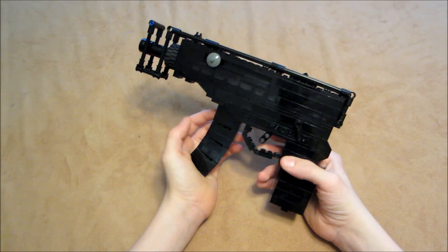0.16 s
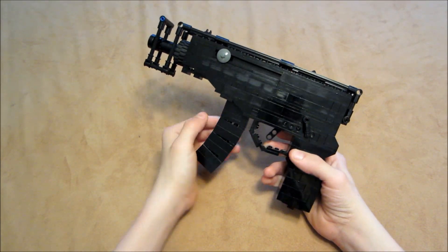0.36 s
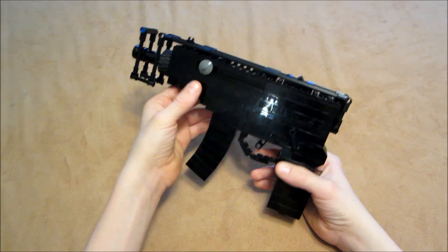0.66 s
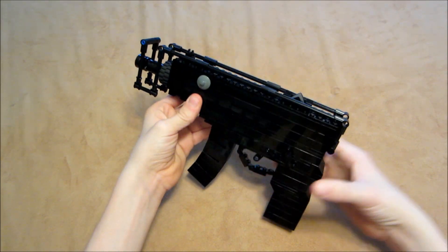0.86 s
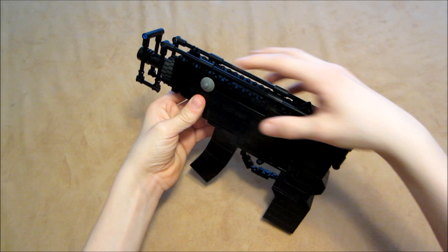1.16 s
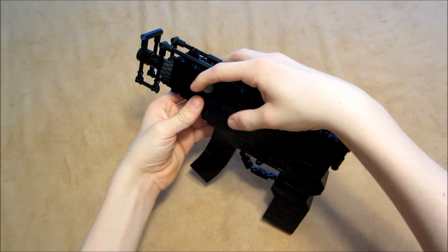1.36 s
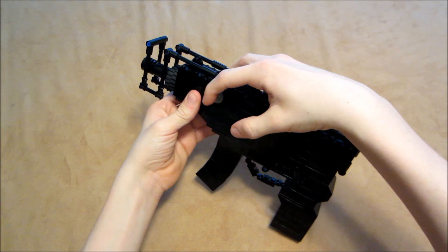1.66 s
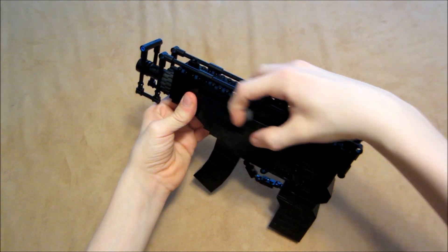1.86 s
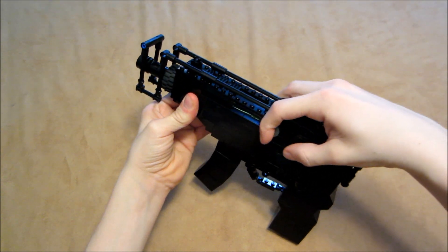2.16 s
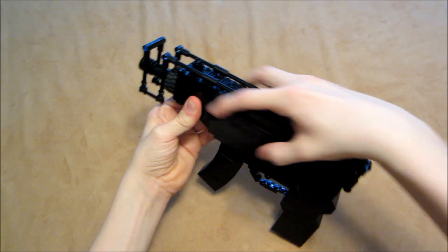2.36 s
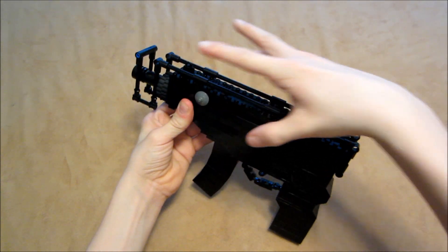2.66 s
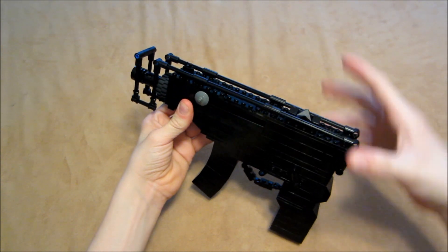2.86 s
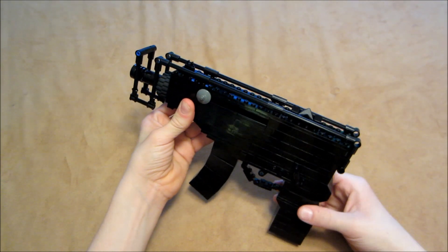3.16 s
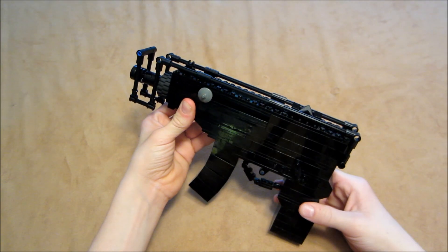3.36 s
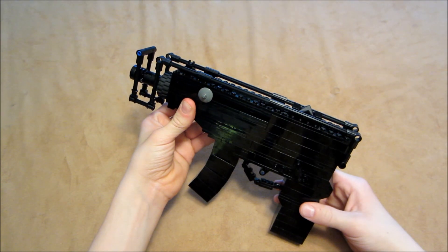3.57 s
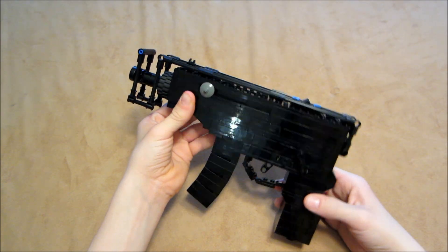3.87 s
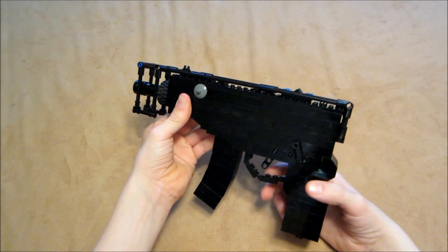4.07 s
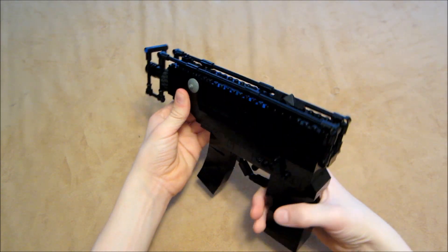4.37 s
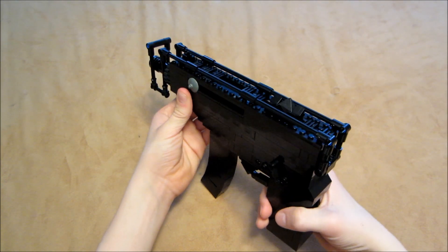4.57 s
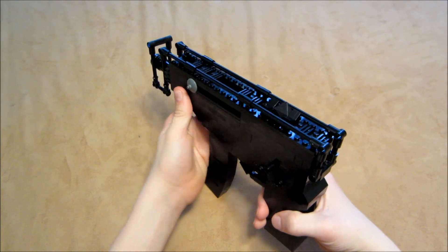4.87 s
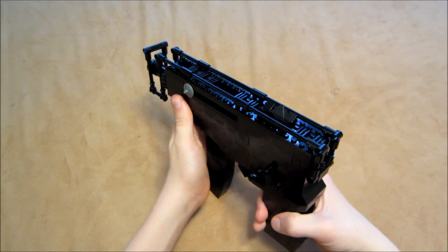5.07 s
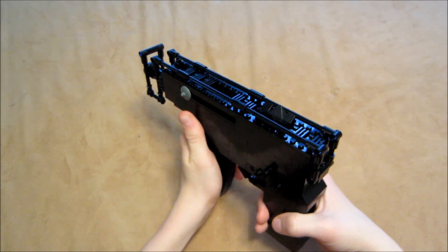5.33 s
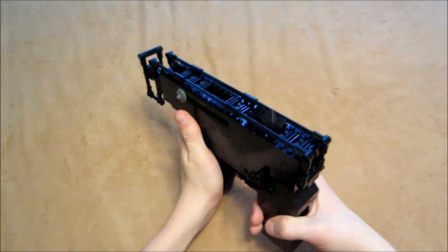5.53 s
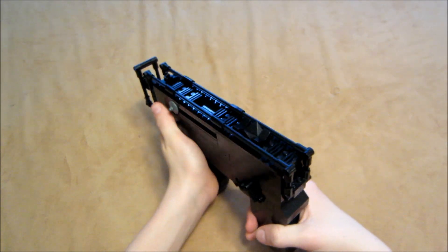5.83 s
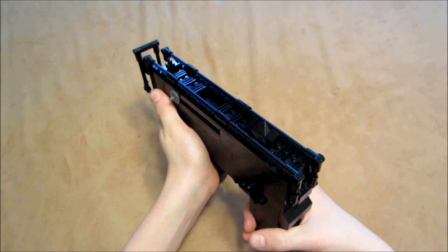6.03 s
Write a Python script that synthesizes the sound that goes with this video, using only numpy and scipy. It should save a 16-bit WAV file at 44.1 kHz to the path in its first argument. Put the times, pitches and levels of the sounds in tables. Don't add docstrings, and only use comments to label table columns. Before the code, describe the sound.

Hollow plastic clicks and rattles, a grinding slide and one crisp snap in a quiet room with low hum, fan and faint ticking.

```python
import sys
import numpy as np
from scipy import signal
from scipy.fft import rfft, irfft
from scipy.io import wavfile
from scipy.ndimage import uniform_filter1d

SR = 44100
rng = np.random.default_rng(int(sys.argv[2]) if len(sys.argv) > 2 else 0)


def wav_out(sig):
    wavfile.write(sys.argv[1], SR, np.round(np.clip(np.atleast_2d(sig).T, -1, 1) * 32767).astype(np.int16))


def amplitude_ratio(level_db):
    exponent = np.asarray(level_db, float) / 20
    return 10 ** exponent


N = 273420

# (frequency [Hz], width [Hz], level [dB])
BRICK_MODES = [(410, 250, -0.5), (810, 480, -1.5), (1250, 290, -1.5), (1540, 160, -8), (1756, 150, -6),
               (2210, 200, -2.5), (2900, 81, -26)]
# (frequency [Hz], density [dB per Hz])
EDGE_COLOUR = [(1530, -0.5), (2600, -3), (2950, -4), (3300, -7.5), (3610, -3.5), (5070, -7), (7630, -24),
               (8000, -60), (10400, -47), (17600, -120)]
# (frequency [Hz], density [dB per Hz])
SNAP_COLOUR = [(4710, -70), (6500, -28), (7900, -35.5), (8800, -13.5), (9840, -5.5), (12400, -2.5),
               (15100, -7), (16000, -38), (16400, -25.5)]
# (peak [s], rise [s], fall [s], skin [dB], rattle [dB])
RUBS = [(0.385, .015, 0.076, -70, -81), (0.71, 0.14, 0.28, -72, -74.5), (0.91, 0.11, 0.04, -74, -69.5),
        (1.0, .08, 0.045, -72.5, -77), (1.64, 0.044, 0.32, -74, -72.5), (1.96, 0.19, 0.35, -64, -62.5),
        (2.46, 0.075, 0.14, -55.5, -58), (2.525, 0.093, 0.026, -58, -59), (3.16, 0.088, 0.092, -77, -74),
        (4.48, 0.093, 0.088, -77, -75), (4.55, 0.041, .08, -73, -69), (4.61, 0.078, 0.037, -66, -63),
        (4.78, 0.42, 0.1, -80, -73), (4.99, 0.12, 0.023, -70.5, -66), (5.16, 0.82, 0.31, -80, -77),
        (5.46, 0.046, 0.061, -63, -61), (5.56, 0.31, 0.21, -76, -65.5), (5.71, 0.21, 0.26, -67.5, -70),
        (5.92, 0.11, 0.23, -72, -74)]
# (lean [dB], grind [dB], rattle [dB], skin [dB])
REST_DB = (-61, -78, -95, -99)


def evened(x):
    return x / np.sqrt(np.mean(x ** 2) + 1e-20)


def read(points, hz):
    f, value = np.transpose(points)
    return np.interp(np.log(hz + 1), np.log(f + 1), value)


def add(mix, start_s, sound):
    part = mix[round(start_s * SR):][:len(sound)]
    part += sound[:len(part)]


def sine(hz, t):
    return np.sin(2 * np.pi * hz * t)


def coloured(x, spectrum):
    n = x.shape[-1]
    return irfft(rfft(x) * amplitude_ratio(read(spectrum, np.fft.rfftfreq(n, 1 / SR))), n)


def resonate(x, hz, width_hz):
    turn = np.exp(2j * np.pi * np.cumsum(hz * np.ones(len(x))) / SR)
    r = np.exp(-np.pi * width_hz / SR)
    return 2 * (turn * signal.lfilter([1 - r], [1, -r], x * turn.conj())).real


def grit(per_s, spread_db):
    size = amplitude_ratio(spread_db * np.minimum(rng.exponential(1, N), 4)) * rng.standard_normal(N)
    return size * (rng.random(N) < per_s / SR)


def burst(spectrum, t60_s, rise_ms, size=2048):
    t = np.arange(size) / SR
    crack = coloured(rng.standard_normal(size), spectrum)
    crack = crack * amplitude_ratio(-60 * t / t60_s) * np.minimum(t / rise_ms * 1e3, 1)
    return crack / abs(crack).max()


def strokes(rows, rest_db):
    swell_db = 33
    t = np.arange(0, N, 64) / SR
    peak, rise, fall, db = np.transpose(rows)[..., None]
    away = np.where(t < peak, (peak - t) / np.maximum(rise, 1e-3), (t - peak) / np.maximum(fall, 1e-3))
    power = (amplitude_ratio(db - swell_db * away) ** 2).sum(0) + amplitude_ratio(rest_db) ** 2
    return np.interp(np.arange(N) / SR, t, np.sqrt(power))


def background():
    # (frequency [Hz], density [dB per Hz])
    air_colour = [(12, -26), (22, 2), (35, -0.5), (65, -10.5), (120, -7), (200, -8.5), (450, -15),
                  (950, -21.5), (1500, -28), (2000, -33.5), (2800, -47.5), (3600, -81.5)]
    # (frequency [Hz], density [dB per Hz])
    hiss_colour = [(1410, -16), (2400, -4), (3770, -4.5), (6200, -8.5), (7520, -23.5), (7700, -48),
                   (8210, -20), (9650, -12.5), (15300, -5.5), (16400, -11)]
    # (frequency [Hz], correlation [-1 to 1])
    likeness = [(60, -0.05), (150, 0.12), (380, 0.28), (950, 0.13), (2380, -0.14), (5980, -0.035),
                (15000, 0.053)]
    # (harmonic [multiple], level [dB rms])
    hum_harmonics = [(1, -56.5), (2, -66), (3, -69.5), (4, -73.5), (5, -73.5)]
    # (frequency [Hz], level [dB rms], width [Hz])
    fan_tones = [(1093.5, -70, 61), (680, -91.5, 1.8), (1712, -83, 47)]
    # (frequency [Hz], left [dB], right [dB])
    whines = [(3843, -106, -109), (7867, -88, -98), (13011, -99, -105), (15734.27, -79.5, -79.4),
              (15747.29, -84.7, -84.9)]
    air_db, hiss_db, hum_hz = -52.5, -76, 120
    lag_s = np.array([[1.1 / SR], [0]])
    hz, t = np.fft.rfftfreq(N, 1 / SR), np.arange(N) / SR
    same = np.clip(read(likeness, hz), -1, 1)

    def pair(spectrum):
        a, b = rfft(coloured(rng.standard_normal((2, N)), spectrum))
        return evened(irfft(np.array([a, same * a + np.sqrt(1 - same ** 2) * b]), N))

    wash = amplitude_ratio(air_db) * pair(air_colour) + amplitude_ratio(hiss_db) * pair(hiss_colour)
    waver = 1 + 0.2 * evened(resonate(rng.standard_normal(N), 0, 3.2))
    hum = waver * sum(amplitude_ratio(db + 3.5) * np.sin(k * (2 * np.pi * hum_hz * t + k)) for k, db in hum_harmonics)
    fan = np.zeros(N)
    for f, db, width_hz in fan_tones:
        flutter = resonate(resonate(rng.standard_normal(N), f, width_hz), f, width_hz)
        fan += amplitude_ratio(db) * evened(2 * sine(f, t) + evened(flutter))
    whine = sum(amplitude_ratio([[left_db + 0.5], [right_db]]) * sine(f, t - lag_s) for f, left_db, right_db in whines)
    return wash + hum * amplitude_ratio([[-1.1], [1.1]]) + fan + whine


def motor():
    # (start [s], end [s], out step [dB], back step [dB])
    runs = [(0.01, 0.8, -56, -57), (0.857, 0.9, -55, -69), (1.053, 2.25, -55.5, -58),
            (3.347, 3.5, -48.5, -65), (3.555, 3.7, -70, -56), (3.762, 3.9, -53.5, -61),
            (3.974, 4.1, -62, -60), (4.1829, 4.3, -55, -56.5), (4.389, 4.75, -55, -56.5),
            (4.807, 5.35, -54.5, -61), (5.431, 5.8, -53.5, -57)]
    cycle_s, back_s, spread_db = 0.2086, 0.1322, -0.5
    out, t = np.zeros(N), np.arange(600) / SR
    tone = sine(3840, t) + 0.48 * sine(4300, t) + 0.33 * sine(5400, t)
    ring = amplitude_ratio(-60 * t / 0.0095) * tone * (1 - np.exp(-t / 0.00079))
    for start, end, out_db, back_db in runs:
        for s in np.arange(start, end, cycle_s):
            for late_s, step_db in ((0, out_db), (back_s, back_db)):
                db = step_db + spread_db * rng.standard_normal()
                snap = amplitude_ratio(db - 9.5) * burst(SNAP_COLOUR, 0.01, 0.17)[:600]
                edge = amplitude_ratio(db - 3) * burst(EDGE_COLOUR, 0.008, 0.24)[:600]
                add(out, s + late_s, amplitude_ratio(db) * ring + snap + edge)
    return out


def leaning():
    # (peak [s], rise [s], fall [s], level [dB])
    leans = [(0.38, 0.17, 0.044, -62), (0.9, 0.96, 0.79, -66), (1.36, 0.11, 0.034, -48.5),
             (1.42, 0.067, 0.36, -49), (1.645, 0.071, 0.37, -41), (1.76, 0.27, 0.14, -49.5),
             (1.9, 0.24, 0.64, -46), (2.09, 0.049, 0.21, -48), (2.377, 0.04, 0.085, -43),
             (2.495, 0.16, 0.14, -35.5), (4.48, 0.092, .12, -62), (4.71, 0.052, 0.33, -44.5),
             (4.96, 0.098, 0.16, -51), (5.14, 0.32, 0.11, -49.5), (5.22, 0.098, 0.91, -51.5),
             (5.5, 0.048, 0.14, -54), (5.7, 0.11, 0.11, -48.5), (5.92, 0.24, 0.38, -50)]
    shove = rng.standard_normal(N)
    lean = resonate(resonate(shove, 65.6, 24), 60, 43)
    lean = lean + 0.87 * resonate(resonate(shove, 118, 32), 124, 31)
    lean = lean / np.sqrt(uniform_filter1d(lean ** 2, size=2600))
    return amplitude_ratio(-1) * lean * strokes(leans, REST_DB[0])


def knocking():
    # (time [s], blow [dB], deep modes [dB], middle modes [dB], board modes [dB])
    knocks = [(0.951, -18, -4, 2, -5.5), (0.971, -42, -11, 4, -6), (1.636, -57, -19, -7, -20),
              (1.751, -35.5, 2, -12, -22), (2.128, -41.5, -36, 5.5, -6), (3.288, -31, 1.5, 6.5, -13.5),
              (4.5976, -23.5, -4.5, 3.5, 0), (4.6136, -36, -26, -9, -0.5), (5.151, -52, 5, -0.5, 1),
              (5.442, -40, -12, 20.5, -21), (5.692, -46, -20, 20.5, -18), (5.848, -26, -1, -11, -13),
              (5.87, -59.5, -19, -17, 4)]
    # (frequency [Hz], level [dB], t60 [s])
    low_modes = [(41.4, -17, 0.88), (64.55, -1, 0.45), (88.6, -5, 0.17), (109.2, -1.5, 0.44),
                 (117, -3.5, 0.21), (136.6, -1.6, 0.3), (171.7, 0, 0.14), (187.9, -6, 0.22)]
    # (frequency [Hz], level [dB], t60 [s])
    board_modes = [(225, -1.5, 0.11), (258.5, 3.5, 0.099), (297, -3.5, 0.18), (302, 2, 0.084),
                   (349.5, -5.5, 0.3), (409, 3, 0.16), (457, -12, 0.15), (477, -4.5, .13),
                   (509, -10.5, 0.13), (577, -24.5, 0.27), (593, -17, 0.24), (627, -4, 0.095),
                   (739, 0.5, 0.1), (802, -9.5, 0.14)]
    low_sides = [-1, -1, -1, -1, -1, 1, 1, -1]
    board_sides = [1] * 12 + [-1, 1]
    # (frequency [Hz], density [dB per Hz])
    thud_colour = [(130, -26), (220, -9.5), (251, 7), (505, 2.5), (675, -23.5), (777, 2), (910, -44),
                   (1600, -33.5), (2080, -55), (3520, -120)]
    hard_contact_ms, softer_ms_per_db = 1.62, 0.5
    out, t = np.zeros(N), np.arange(SR // 2) / SR

    def rings(modes, sides):
        return [side * amplitude_ratio(db - 60 * t / t60_s) * np.cos(2 * np.pi * hz * t)
                for (hz, db, t60_s), side in zip(modes, sides)]

    low = rings(low_modes, low_sides)
    deep, middle, board = sum(low[:4]), sum(low[4:]), sum(rings(board_modes, board_sides))
    for s, db, deep_db, middle_db, board_db in knocks:
        contact_ms = max(hard_contact_ms - softer_ms_per_db * board_db, 0.5)
        push = np.sin(np.pi * np.minimum(t[:600] / contact_ms * 1e3, 1)) ** 2
        modes = amplitude_ratio(deep_db) * deep + amplitude_ratio(middle_db) * middle + amplitude_ratio(board_db) * board
        add(out, s - contact_ms / 2000, amplitude_ratio(db) * np.convolve(modes, push / push.sum()))
        add(out, s, amplitude_ratio(db - 2.5 + 1.8 * board_db) * burst(thud_colour, 0.12, 2.2, size=8192))
    return out


def skin(spread_db):
    rubs = [row[:4] for row in RUBS]
    return evened(coloured(grit(12000, spread_db), SNAP_COLOUR)) * strokes(rubs, REST_DB[3])


def wide_skin():
    return amplitude_ratio(-9) * skin(1.5) * np.array([[1], [-1]])


def scrape():
    # (peak [s], rise [s], fall [s], level [dB])
    grinds = [(0.87, .5, 0.036, -69), (1.004, 0.081, 0.087, -60), (1.38, 0.081, 0.043, -56.5),
              (1.5, 0.22, 0.41, -70), (1.898, .012, 0.11, -52.5), (2.0, 0.2, 0.33, -52.5),
              (2.08, .15, 0.09, -64), (2.2, 0.086, 0.11, -59.5), (2.378, .006, 0.4, -53),
              (2.46, 0.085, 0.22, -43.5), (2.55, .1, 0.051, -99), (4.2, 0.15, 0.24, -63.5),
              (4.48, 0.041, .08, -55), (4.554, 0.065, 0.13, -48.5), (4.611, 0.057, 0.073, -39.5),
              (4.66, .05, 0.078, -64), (4.93, 0.024, 0.036, -56), (5.17, .05, 0.18, -65),
              (5.45, 0.049, .2, -61.5), (5.499, 0.054, 0.077, -47), (5.57, 0.12, 0.47, -63),
              (5.75, 0.14, 0.12, -57.5), (5.848, 0.031, 0.064, -50)]
    rattle_under_grind_db = -11
    slips = grit(3000, 1.7)
    grip = 1 + 0.016 * evened(resonate(resonate(rng.standard_normal(N), 0, 22), 0, 22))
    hollow = np.zeros(N)
    for k, (hz, width_hz, db) in enumerate(BRICK_MODES):
        hollow += (-1) ** k * amplitude_ratio(db) * resonate(resonate(slips, hz * grip, width_hz), hz * grip, 440)
    rattle = coloured(grit(3300, 1.8) + 0.5 * slips, EDGE_COLOUR)
    shaken = [(s, rise, fall, db + rattle_under_grind_db) for s, rise, fall, db in grinds]
    shaken += [(s, rise, fall, db) for s, rise, fall, _, db in RUBS]
    return evened(hollow) * strokes(grinds, REST_DB[1]) + evened(rattle) * strokes(shaken, REST_DB[2])


def shudder():
    # (frequency [Hz], width [Hz], level [dB])
    shell_modes = [(700, 82, -5.5), (1240, 80, 1), (1573, 72, -2), (1888, 83, -3), (2300, 130, -7.5),
                   (3050, 200, -26), (3630, 150, -19), (4440, 140, -18), (5800, 200, -29)]
    # (peak [s], rise [s], fall [s], level [dB])
    shudders = [(0.962, 0.016, .05, -43.5), (0.972, .02, .03, -46), (0.998, 0.044, .06, -51.5),
                (1.015, .03, 0.13, -59.5), (1.36, .02, .06, -65), (1.382, 0.022, 0.065, -58),
                (1.475, .02, 0.073, -67), (1.527, .012, 0.069, -60.5), (1.668, .04, .06, -66.5),
                (1.9, 0.013, 0.1, -52.5), (1.95, .1, .15, -62), (2.47, .02, 0.051, -50),
                (4.565, .05, 0.054, -53), (4.62, .02, .08, -56), (5.15, 0.0066, 0.052, -57),
                (5.51, .02, 0.14, -58), (5.6, .1, 0.52, -64.5)]
    shake = rng.standard_normal(N)
    shake = shake * abs(shake)
    out = np.zeros(N)
    for k, (hz, width_hz, db) in enumerate(shell_modes):
        out += (-1) ** k * amplitude_ratio(db) * evened(resonate(resonate(shake, hz, width_hz), hz, 360))
    return evened(out) * strokes(shudders, -100)


def catch():
    # (frequency [Hz], level [dB], t60 [s])
    catch_modes = [(710, -19, .008), (1250, -9, 0.0038), (1650, 1.5, 0.015), (2170, 1.5, 0.011),
                   (2900, -12, 0.0075), (3550, -19, .01), (4400, -27, .01), (4780, -12.5, 0.0069)]
    # (time [s], level [dB])
    blows = [
        (5.4801, -21.5),
        (5.4816, -15),
    ]
    out, t = np.zeros(N), np.arange(2048) / SR
    ring = -sum(amplitude_ratio(db - 60 * t / t60_s) * sine(hz, t) for hz, db, t60_s in catch_modes)
    ring = ring * (1 - np.exp(-t / 0.00015))
    for s, db in blows:
        add(out, s, amplitude_ratio(db) * ring)
    return out


def pins():
    # (time [s], level [dB], frequency [Hz])
    ticks = [(0.951, -47.5, 4440), (0.951, -54, 3630), (1.472, -58, 3750), (2.384, -47, 1040),
             (2.4415, -45, 1100), (2.4445, -48, 700), (2.46, -57, 4050), (2.4895, -42, 940),
             (2.4895, -50, 3000), (2.503, -44.5, 2300), (2.527, -62, 4200), (2.527, -49, 890),
             (3.263, -70, 1550), (4.479, -56, 2010), (4.4815, -56, 3900), (4.5675, -60, 4000),
             (4.574, -53, 5200), (4.582, -58, 5200), (4.605, -37, 2100), (4.6145, -53, 2200),
             (4.619, -46, 3100), (4.553, -47, 1250), (3.2635, -61, 12100), (1.4608, -56, 1490),
             (1.8955, -57, 1300), (2.4594, -38, 2300), (4.973, -64, 6100), (4.981, -62, 5900),
             (4.988, -59, 6100), (4.994, -61, 6300), (2.372, -43, 5470), (2.384, -43, 5240),
             (2.391, -46, 4500), (2.186, -45.5, 5800), (2.229, -61, 4600), (2.173, -62, 5500),
             (2.124, -57, 3000), (4.641, -64, 4800), (4.662, -59, 2620)]
    cycles_to_60_db = 19
    out, t = np.zeros(N), np.arange(2048) / SR
    for s, db, hz in ticks:
        decay = amplitude_ratio(db + 8.5 - 60 * t * hz / cycles_to_60_db)
        add(out, s, decay * sine(hz, t) * (1 - np.exp(-t * hz / 0.97)))
    return out


def clicks():
    # (time [s], peak [dB], ring [Hz], edge [dB], snap [dB])
    snaps = [(0.9587, -45, 1330, -48, -61), (0.966, -42, 1870, -52.5, -65.5),
             (1.374, -47, 1300, -52.5, -54), (1.47, -51.5, 2380, -55, -60), (1.9991, -28.5, 1305, -38, -53),
             (2.095, -51, 1470, -58, -64), (2.1838, -42, 2170, -43.5, -37.5),
             (2.372, -58, 2160, -43.5, -41.5), (2.384, -49, 2090, -44, -42),
             (2.3908, -52, 2160, -43.5, -44), (2.3972, -42, 2160, -46, -45), (2.4162, -49, 2040, -54, -49),
             (2.4352, -42, 1820, -47, -65), (2.449, -48, 1400, -48, -54), (2.4601, -33, 1250, -36, -39.5),
             (2.486, -46, 1340, -64, -60), (2.5022, -39, 1100, -49.5, -53), (4.4804, -52, 1230, -56, -58),
             (4.594, -32, 1170, -43, -50), (4.6047, -37, 3050, -47, -49), (4.6139, -39, 2900, -48, -53),
             (5.1486, -43, 1350, -60, -58), (5.4803, -29, 1630, -32, -25.5),
             (5.4818, -51, 1560, -30.5, -44), (5.8432, -43, 2090, -62, -57)]
    # (time [s], peak [dB], ring [Hz], edge [dB])
    taps = [(0.387, -46.5, 1190, -61), (0.9517, -48.5, 1140, -60), (0.97, -38.5, 1240, -55.5),
            (0.973, -52.5, 1820, -70), (0.994, -49, 1900, -71), (1.008, -44.5, 1320, -78),
            (1.019, -51, 1560, -78), (1.3505, -60, 2430, -65), (1.358, -53, 1290, -77),
            (1.388, -51, 1500, -77), (1.434, -45, 1130, -86), (1.462, -55, 2360, -57),
            (1.522, -53, 1440, -66.5), (1.3832, -53, 1200, -72), (1.8953, -42, 1570, -68),
            (1.901, -43.5, 2130, -73), (1.905, -50, 2250, -72), (1.92, -45, 1000, -64),
            (1.945, -49, 1480, -60), (1.959, -52, 1500, -74), (1.9948, -39, 2060, -55),
            (2.0133, -37.5, 1560, -61), (2.0274, -46, 1510, -72), (2.045, -39, 1110, -74),
            (2.0612, -45.5, 2270, -57.5), (2.123, -45.5, 1330, -64), (2.4294, -39.5, 1750, -56),
            (2.465, -47, 1910, -56), (2.475, -43, 1690, -64), (2.495, -45, 1080, -60),
            (2.51, -58, 1510, -69), (2.591, -48.5, 1190, -71), (3.263, -57.5, 3680, -59),
            (4.5503, -44.5, 1220, -56), (4.569, -48, 1520, -59), (4.573, -52, 2160, -59),
            (4.621, -41, 1250, -77), (4.685, -50, 1080, -75), (4.697, -42, 860, -78),
            (4.927, -53, 2160, -60.5)]
    # (time [s], peak [dB], ring [Hz], edge [dB])
    late_taps = [(5.488, -40, 2120, -50), (5.493, -35, 1600, -72), (5.506, -48, 1510, -65),
                 (5.516, -54, 1570, -73.5), (5.684, -58, 1270, -60.5), (4.052, -61, 2210, -66.5),
                 (5.78, -61, 1210, -61), (5.852, -39, 695, -80), (5.8653, -42, 754, -60),
                 (5.876, -42, 700, -80), (5.893, -69, 2900, -66), (5.724, -53, 2000, -81),
                 (5.747, -52, 1930, -71), (5.76, -55, 2000, -80)]
    snap_partner, tap_partner = 0.44, 0.28
    tap_snap_db = -2
    rise_s, t60_s = 0.0011, 0.011
    low_cut_hz = 420
    out, t = np.zeros(N), np.arange(2048) / SR
    body_hz, _, body_db = np.transpose(BRICK_MODES)[..., None]
    events = [tuple(row) + (snap_partner,) for row in snaps]
    for s, db, hz, edge_db in list(taps) + list(late_taps):
        events.append((s, db, hz, edge_db, edge_db + tap_snap_db, tap_partner))
    for s, db, hz, edge_db, snap_db, partner in events:
        share, phase = rng.random((len(BRICK_MODES), 2)).T[..., None]
        body_gain = amplitude_ratio(body_db - 27 * share) * np.minimum(body_hz / 1500, 1) ** 2
        body = body_gain * np.sin(2 * np.pi * (body_hz * t + phase))
        partner_hz = hz * 1.383 if hz < 1750 else hz / 1.28
        ring = sine(hz, t) + partner * sine(partner_hz, t) + 0.21 * body.sum(0)
        ring += 0.083 * partner * sine(hz * 1.6, t)
        ring *= -amplitude_ratio(db + 10 - 60 * t / t60_s) * (1 - np.exp(-t / rise_s))
        edge = amplitude_ratio(edge_db + 9) * burst(EDGE_COLOUR, 0.013, 0.2)
        snap = amplitude_ratio(snap_db + 5) * burst(SNAP_COLOUR, 0.0064, 0.091)
        add(out, s, ring + edge + snap)
    return signal.sosfilt(signal.butter(2, low_cut_hz, "high", fs=SR, output="sos"), out)


def room(x):
    # (frequency [Hz], t60 [s])
    decay = [(300, 0.53), (1500, 0.43), (4000, 0.15), (12000, 0.084)]
    echoes = np.zeros((2, SR // 2))
    at = np.arange(300, SR // 2 - 20, 20) + rng.integers(0, 20, (2, (SR // 2 - 301) // 20))
    np.put_along_axis(echoes, at, rng.choice([-1., 1.], at.shape), 1)
    echoes[1] = 0.96 * echoes[0] + 0.51 * echoes[1]
    hz, t, z = signal.stft(echoes, SR, nperseg=256)
    tail = signal.istft(z * amplitude_ratio(-60 * t / read(decay, hz)[:, None]), SR, nperseg=256)[1]
    tail = tail / np.linalg.norm(tail, axis=1, keepdims=True)
    return signal.fftconvolve(x[None], tail, axes=1)[:, :N]


def ports(x):
    # (frequency [Hz], phase [rad])
    lead = [(20, 0), (350, -.15), (1400, -.4), (4500, -.5), (8600, -1.2), (12000, -1.4), (16000, -1.9)]
    # (frequency [Hz], level [dB])
    balance = [(60, -1), (180, -1.5), (550, -0.5), (1650, -3), (4970, -2.5), (15000, -0.5)]
    hz = np.fft.rfftfreq(N, 1 / SR)
    half = amplitude_ratio(read(balance, hz) / 2) * np.exp(0.5j * read(lead, hz))
    return irfft(rfft(x) * np.array([half, 1 / half]), N)


def scene():
    # (frequency [Hz], level [dB])
    tail_colour = [(60, -15.5), (200, -9), (500, 0.5), (3000, -10), (6000, -3), (12000, -4)]
    top_hz = 15875
    still = signal.oaconvolve(background(), signal.firwin(2047, top_hz, fs=SR)[None], "same")
    wood = leaning() + knocking()
    plastic = shudder() + catch() + pins() + clicks()
    near = motor() + wood + skin(1.7) + scrape() + plastic
    tail = room(coloured(amplitude_ratio(-15.5) * plastic + amplitude_ratio(-11.5) * wood, tail_colour))
    return still + tail + wide_skin() + ports(near)


def band_limit(x):
    return signal.sosfilt(signal.butter(12, 16720, fs=SR, output="sos"), x)


def record(dry):
    return band_limit(dry)


dry = scene()
out = record(dry)
wav_out(out)
```